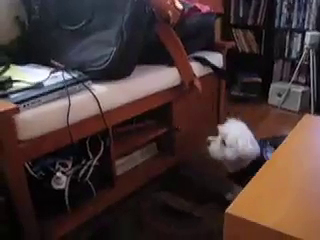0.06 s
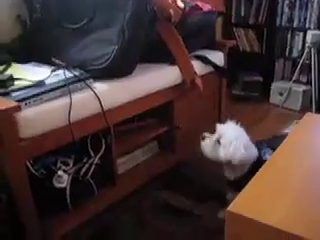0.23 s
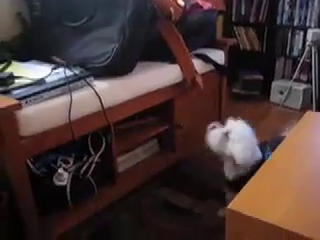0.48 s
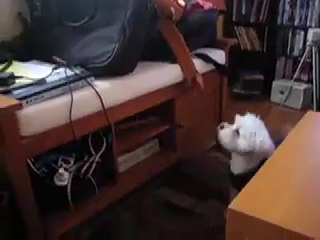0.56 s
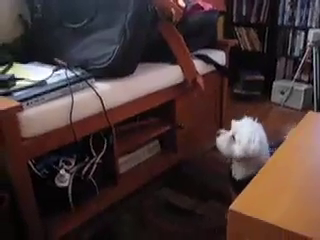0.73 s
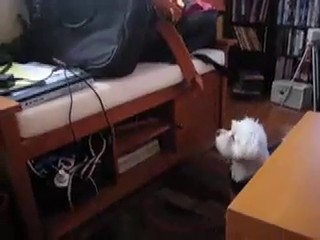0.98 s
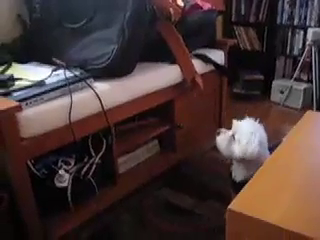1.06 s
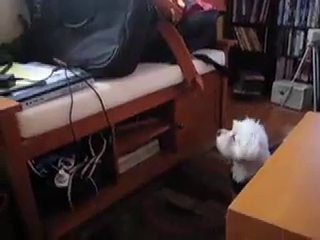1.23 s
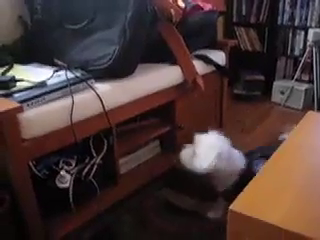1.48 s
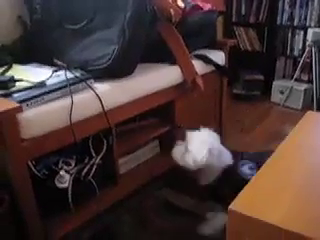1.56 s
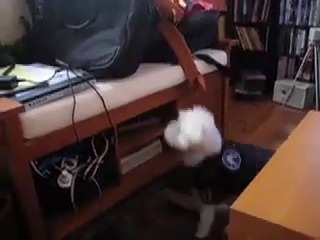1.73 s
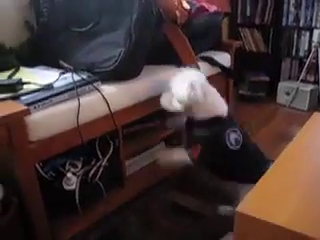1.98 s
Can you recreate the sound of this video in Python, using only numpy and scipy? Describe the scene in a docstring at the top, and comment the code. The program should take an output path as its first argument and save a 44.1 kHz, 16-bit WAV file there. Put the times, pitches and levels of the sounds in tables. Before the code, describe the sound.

A small dog sniffs and snorts, gives one gruff bark, then draws breath and lets out a short yip. Each call ends in a huff. Its paws thud softly on carpet in a quiet living room.

```python
"""A small dog gives one gruff bark and later a short yip, as its vocal folds chop its breath into pulses.
Each call ends in a huff of rushing air. Before the bark it sniffs and splutters a wet snort through its
nose; before the yip it draws breath, then hops and lands with soft thuds on the carpet.
The furnished living room adds a short echo, over a faint hiss and hum."""
import sys
import numpy as np
from scipy import signal
from scipy.fft import rfft, irfft
from scipy.io import wavfile

SR = 44100
rng = np.random.default_rng(int(sys.argv[2]) if len(sys.argv) > 2 else 0)


def inscribe(sig):
    """Save sig as 16-bit PCM at rate SR to the path in sys.argv[1].

    A 1-D sig is mono; a 2-D sig holds one channel per row.
    Samples are clipped to [-1, 1] before scaling.
    """
    pcm = np.round(np.clip(np.atleast_2d(sig).T, -1, 1) * 32767)
    wavfile.write(sys.argv[1], SR, pcm.astype(np.int16))


N = 88200
T = np.arange(N) / SR

# pitch and loudness of the bark (t/s, f/Hz, level/dB)
BARK_CURVE = [(0.465, 329.3, -50), (.472, 337.5, -41.5), (.489, 398.3, -31), (.499, 547.3, -15),
              (.509, 631.6, -11.5), (.527, 653.5, -12), (0.536, 581, -19.5), (0.546, 497, -20.5),
              (0.557, 455, -29)]
# mouth opening in the bark (t/s, factor on the throat's frequencies)
MOUTH_OPENING = [(.468, 1.2), (.495, 0.68), (.51, 1.04), (.526, 1.04), (.545, 0.87)]
# where the throat rings (f/Hz, width/Hz, level/dB, how much it follows the mouth 0-1)
THROAT_BANDS = [(620, 340, -0.5, 0.7), (1010, 380, -2, 0.7), (1316, 330, -1, 1), (2016, 220, 0.5, 0.13),
                (2360, 210, -11, 0), (2790, 220, -13.5, 0.2), (3540, 330, -14.5, 0)]
# chest growl under the bark (t/s, level/dB)
GROWL_CURVE = [(0.467, -45), (0.472, -31), (0.487, -26), (.515, -21.5), (0.529, -55), (0.534, -42)]
# nose whistle as the bark turns into a huff (t/s, f/Hz, level/dB)
WHISTLE_CURVE = [(0.489, 4900, -35), (0.507, 4760, -26.5), (0.524, 4770, -26), (0.541, 5500, -25),
                 (.562, 5730, -37), (.585, 5800, -57)]
# pitch and loudness of the yip (t/s, f/Hz, level/dB)
YIP_CURVE = [(1.644, 431.3, -45), (1.651, 448.8, -32.5), (1.667, 489.6, -19.5), (1.673, 509.6, -19),
             (1.696, 517.8, -22), (1.699, 508.6, -30.5), (1.722, 480.4, -32), (1.746, 405, -51)]
# strength of the yip's harmonics (f/Hz, level/dB)
YIP_COLOUR = [(480, -4), (900, -2.5), (1050, -22.5), (1500, -21.5), (2000, -20), (2500, -21), (3200, -22.5),
              (3900, -39), (14000, -38)]
# squeaks over the yip (peak t/s, rise/s, fall/s, f/Hz, glide/(Hz per s), level/dB)
SQUEAKS = [(1.665, .007, 0.018, 4850, 23992, -33.5), (1.699, .008, 0.01, 13950, -3000, -41),
           (1.72, .005, .007, 10400, -2000, -37)]
# breaths out (t/s, rise/s, hold/s, time to fade 20 dB/s, level/dB, sag/dB)
HUFFS = [(0.524, 0.016, 0.072, 0.071, -20, -2), (1.663, 0.043, 0.045, 0.09, -27, -2.5)]
# tone colour, one list per huff (f/Hz, level/dB)
HUFF_COLOURS = [
    [(80, -38), (250, -32), (400, -28), (600, -3), (790, -13), (950, -4.5), (1270, -4.5), (1500, -7.5),
     (1730, -13), (1900, -8.5), (2350, -6.5), (2650, -8.5), (4300, -9.5), (5400, -9.5), (6500, -18),
     (9200, -13.5), (11000, -23.5), (14000, -26), (15500, -50)],
    [(80, -28), (300, -8), (420, 7), (700, -1.5), (1200, -9), (1750, -7), (2800, -0.5), (3700, -3),
     (5300, -1), (6500, -5), (8000, -6.5), (9600, -5.5), (11500, -14), (14000, -16), (15500, -37)],
]
# breaths in (t/s, rise/s, hold/s, fade/s, level/dB, sag/dB)
INHALES = [(1.29, 0.056, 0.046, 0.16, -38.5, -0.5), (1.54, 0.025, 0.091, 0.026, -45, -2),
           (0.3974, 0.017, 0.013, 0.04, -36.5, -1.5), (1.79, 0.042, 0.025, 0.021, -40.5, -2)]
# tone colour of a breath in (f/Hz, level/dB)
BREATH_COLOUR = [(200, -16), (450, -7), (1000, -8), (1600, -6.5), (2300, -3), (3500, -1), (5500, -6.5),
                 (8000, -10.5), (12000, -17), (15500, -29)]
# wet pops of the snort (t/s, level/dB, decay/s, f/Hz, width/Hz, spray/dB)
SNORT_POPS = [(0.2067, -15.5, 0.0024, 2420, 1800, -18), (0.211, -12.5, 0.0082, 2610, 1010, -9.5),
              (0.2315, -19.5, 0.0029, 600, 455, 1), (0.2383, -25.5, 0.0015, 2860, 1500, 5),
              (0.24, -15, .0018, 860, 446, 4.5), (0.2544, -12, 0.005, 1430, 910, -3),
              (.262, -20, 0.011, 3020, 1970, -1.5), (0.2702, -24, 0.0093, 1440, 905, -2)]
# where the nose rings (f/Hz, width/Hz, level/dB)
NOSE_BANDS = [(570, 83, -5), (907, 120, -4), (1544, 140, -2), (2445, 430, -0.5), (3240, 230, 5)]
# tone colour of wet spray (f/Hz, level/dB)
SPRAY_COLOUR = [(180, 10.5), (330, -1.5), (550, 8.5), (3300, -4.5), (4500, -1), (8700, -3.5), (11500, -8.5),
                (12600, -8), (15500, -32)]
# nostril hisses and whistles (peak t/s, rise/s, f/Hz, glide/(Hz per s), width/Hz, level/dB)
SNIFF_BANDS = [(0.12, 0.063, 3160, -600, 640, -44), (0.223, 0.038, 6450, -6000, 600, -39),
               (0.234, 0.039, 4500, -12000, 1200, -33.5), (0.21, 0.055, 8700, -7000, 900, -39.5),
               (0.22, 0.19, 3400, -2, 7800, -39.5)]
# mouth and claw ticks (t/s, level/dB, decay/s, f/Hz, width/Hz, spray/dB)
TICKS = [(0.029, -32.5, 0.0011, 7000, 4000, 1), (0.4155, -29, 0.0079, 2350, 2460, -15),
         (.591, -22.5, 0.0013, 620, 300, -12), (0.804, -40.5, 0.0028, 6500, 5000, 2),
         (1.542, -25, 0.0011, 3080, 2220, -6)]
# paws on the carpet (t/s, level/dB, f/Hz)
PAW_STEPS = [(0.586, -41.5, 74), (1.433, -42, 394), (1.546, -37.5, 85.5), (1.573, -39, 177),
             (1.598, -35.5, 77), (1.793, -30, 106), (1.821, -25, 137), (1.832, -26.5, 116),
             (1.858, -32, 173), (1.897, -37, 134)]
# first echoes off the furniture (delay t/s, level/dB)
ECHOES = [(.0046, -14.5), (0.0151, -24.5), (0.0159, -10.5)]
# notes at which the room rings (f/Hz, level/dB)
ROOM_NOTES = [(472, 4), (612, -2.5), (668, -5), (752, 4.5), (925, 2), (1005, -1.5), (1076, -5), (1262, 5),
              (1339, -1.5), (1456, -4), (1906, -3.5), (2160, -8), (2302, 2)]
# how long the room's tail takes to fade 60 dB (f/Hz, t/s)
ROOM_FADE = [(200, 0.66), (500, 0.456), (4000, 0.3735), (9000, 0.24), (15000, 0.6)]
# tone colour of the background hiss (f/Hz, level/dB)
HISS_COLOUR = [(15, -6), (25, 0.5), (79, -2), (246, -7), (274, -12), (305, 5), (331, -9.5), (598, -9.5),
               (848, -7), (1140, -11.5), (2300, -13), (7100, -15.5), (9050, -22), (12000, -25.5),
               (15500, -25)]
# background hum and whine (f/Hz, width/Hz, level/dB)
HUM_BANDS = [(304, 10, -64.5), (7780, 420, -62.5), (10600, 1200, -60.5), (15140, 60, -71)]


def bark(jitter=0.07, unevenness=0.98, roughness=0.5, hiss_db=-16.5):
    """Rough vocal fold pulses, strong and weak in turn, ring the throat as the mouth opens and closes."""
    times, pitch, db = np.transpose(BARK_CURVE)
    cycles = np.cumsum(np.interp(T, times, pitch) * (1 + jitter * wobble(200))) / SR
    pulses = sum(np.cos(2 * np.pi * k * cycles) for k in range(1, 9))
    folds = unit(pulses * (1 + unevenness * np.cos(np.pi * cycles)))
    airflow = 0.39 + np.exp(-(cycles / 2 % 1) / 0.4)  # a puff on every second pulse
    puffs = unit(signal.lfilter([1], [1, -0.7], airflow * rng.standard_normal(N)))
    buzz = (1 - roughness) * folds + roughness * puffs
    mouth = np.interp(T, *np.transpose(MOUTH_OPENING))
    voice = sum((-1) ** k * amp(band_db) * resonate(buzz, hz * mouth ** share, width)
                for k, (hz, width, band_db, share) in enumerate(THROAT_BANDS))
    hiss = amp(hiss_db) * follow_level(puffs, times, db)
    return low_cut(follow_level(voice, times, db) + hiss + growl() + nose_whistle(puffs), hz=145)


def growl(pulse_hz=173.6, jitter=0.2):
    """Slower, uneven pulses ring the chest under the bark."""
    cycles = np.cumsum(pulse_hz * (1 + jitter * wobble(152))) / SR
    pulses = np.diff(np.floor(cycles), prepend=0) - pulse_hz / SR
    return follow_level(resonate(pulses, hz=266, width=150), *np.transpose(GROWL_CURVE))


def nose_whistle(puffs):
    """The bark's puffs of air ring the nose at a climbing pitch."""
    times, hz, db = np.transpose(WHISTLE_CURVE)
    return follow_level(resonate(puffs, np.interp(T, times, hz), width=420), times, db)


def yip(jitter=0.008, breathiness=0.015, brighten=0.73, dull_db_per_s=220):
    """A nearly clean note rises and falls; it brightens with effort, then dulls."""
    times, pitch, db = np.transpose(YIP_CURVE)
    hz = np.interp(T, times, pitch) * (1 + jitter * wobble(235))
    phase = 2 * np.pi * np.cumsum(hz) / SR
    effort_db = np.interp(T, times, db) - db.max()
    bright = amp(brighten * effort_db - dull_db_per_s * np.maximum(T - times[2], 0))
    voice = sum(amp(look_up(YIP_COLOUR, k * hz)) * (bright if k > 2 else 1) * np.sin(k * phase)
                for k in range(1, 28))
    return follow_level(voice, times, db) + breathiness * level(times, db) * noise(BREATH_COLOUR)


def squeak(peak, rise, fall, hz, glide, db):
    """A thin, unsteady whistle slides in pitch."""
    t = T - peak
    pitch = (hz + glide * np.clip(t, -rise, 1.6 * fall)) * (1 + 0.0084 * wobble(350))
    return amp(db) * swell(t, rise, fall) * unit(np.sin(2 * np.pi * np.cumsum(pitch) / SR))


def breath(colour, start, rise, hold, fade, db, sag_db, flutter=0.13):
    """A fluttering rush of air grows, sags a little, then drops 20 dB in each fade time."""
    t = T - start
    drop_db = sag_db * np.clip((t - rise) / hold, 0, 1) - 20 * np.maximum(t - rise - hold, 0) / fade
    air = unit(noise(colour) * (1 + flutter * wobble(170)))
    return amp(db + drop_db) * np.clip(t / rise, 0, 1) * air


def snort(leak_db=-6):
    """A run of wet pops rings the nose; some of the sound leaks straight out."""
    air = sum(pop(*row) for row in SNORT_POPS)
    ringing = sum(amp(db) * signal.lfilter(*signal.iirpeak(hz, hz / width, SR), air)
                  for hz, width, db in NOSE_BANDS)
    return amp(leak_db) * air + ringing


def pop(start, db, decay, hz, width, spray_db):
    """A sudden burst rings at one pitch, with a hiss of spray."""
    shape = (T >= start) * np.exp(-np.maximum(T - start, 0) / decay)
    ring = unit(resonate(shape * rng.standard_normal(N), hz, width)) * np.sqrt(np.mean(shape ** 2))
    return amp(db) * (ring + amp(spray_db) * shape * noise(SPRAY_COLOUR))


def sniff(fall_s=0.055):
    """Air hisses through the nostrils; each whistle swells, drops in pitch and fades."""
    out = np.zeros(N)
    for peak, rise, hz, glide, width, db in SNIFF_BANDS:
        t = T - peak
        pitch = hz + glide * np.clip(t, -2 * rise, 2 * rise)
        out += amp(db) * swell(t, rise, fall_s) * noise_band(pitch, width)
    return out


def paw(start, db, hz, rise_s=0.0025, decay_s=0.015, scuff_db=-7.5):
    """A soft step: the floor thuds and the carpet scuffs."""
    t = np.maximum(T - start, 0)
    thud = 2 * np.sin(2 * np.pi * hz * t)
    scuff = amp(scuff_db) * noise_band(hz=194, width=270)
    return amp(db) * (1 - np.exp(-t / rise_s)) * np.exp(-t / decay_s) * (thud + scuff)


def room(x, tail_db=-10.5, build_s=0.021, ring_s=0.23):
    """Sound bounces off the furniture, rings the room and blurs into a short tail."""
    echoes = sum(amp(db) * np.interp(T - delay, T, x, left=0) for delay, db in ECHOES)
    hz, times, bands = signal.stft(rng.standard_normal(SR // 2), SR, nperseg=256)
    tail = signal.istft(bands * amp(-60 * times / look_up(ROOM_FADE, hz)[:, None]), SR, nperseg=256)[1]
    t = T[:len(tail)]
    tail *= np.minimum(t / build_s, 1) ** 2
    rate = np.log(1000) / ring_s  # fades 60 dB in ring_s
    notes = sum(amp(db) * np.cos(2 * np.pi * f * t) for f, db in ROOM_NOTES)
    ringing = 2 * rate / SR * np.exp(-rate * t) * notes
    return x + echoes + signal.fftconvolve(x, ringing + amp(tail_db) * tail / np.linalg.norm(tail))[:N]


def background(hiss_db=-44):
    """Steady hiss with a wavering hum and a soft whine."""
    hiss = amp(hiss_db) * noise(HISS_COLOUR)
    return hiss + sum(amp(db) * noise_band(hz, width) for hz, width, db in HUM_BANDS)


def amp(db):
    """Turns decibels into a gain."""
    return 10 ** (np.asarray(db) / 20)


def unit(x):
    """Scales a sound to an average strength (rms) of 1."""
    return x / np.sqrt(np.mean(x ** 2) + 1e-20)


def look_up(points, hz):
    """Reads a table between its frequencies, on a log scale."""
    f, value = np.transpose(points)
    return np.interp(np.log(hz + 1), np.log(f), value)


def level(times, db):
    """Gain along a level curve, silent outside it."""
    return amp(np.interp(T, times, db)) * (T >= times[0]) * (T <= times[-1])


def follow_level(x, times, db):
    """Gives a steady sound the loudness of a level curve."""
    gain = level(times, db)
    return gain * x / np.sqrt(np.average(x ** 2, weights=gain ** 2))


def swell(t, rise, fall):
    """A smooth hump that peaks at t = 0."""
    return np.exp(-(t / np.where(t < 0, rise, fall)) ** 2 / 2)


def noise(colour):
    """Noise with the given tone colour."""
    gain = amp(look_up(colour, np.fft.rfftfreq(N, 1 / SR)))
    return unit(irfft(rfft(rng.standard_normal(N)) * gain, N))


def noise_band(hz, width):
    """Noise around one pitch."""
    return unit(resonate(rng.standard_normal(N), hz, width))


def wobble(hz):
    """Random motion, mostly slower than hz."""
    return unit(irfft(rfft(rng.standard_normal(N)) / (1 + (np.fft.rfftfreq(N, 1 / SR) / hz) ** 2), N))


def resonate(x, hz, width):
    """Lets a sound ring in a band around hz, which may move."""
    spin = np.exp(2j * np.pi * np.cumsum(hz * np.ones(N)) / SR)
    r = np.exp(-np.pi * abs(width) / SR)
    return 2 * (spin * signal.lfilter([(1 - r) ** 2], [1, -2 * r, r * r], x / spin + 1e-18)).real


def low_cut(x, hz):
    """Removes deep bass, which a small body cannot give off."""
    return signal.sosfilt(signal.butter(4, hz, "high", fs=SR, output="sos"), x)


def scene():
    """The dog in the room, over the background."""
    splutter = low_cut(snort() + sum(pop(*row) for row in TICKS), hz=172)
    calls = bark() + yip() + sum(squeak(*row) for row in SQUEAKS)
    huffs = sum(breath(colour, *row) for colour, row in zip(HUFF_COLOURS, HUFFS))
    inhales = sum(breath(BREATH_COLOUR, *row) for row in INHALES) + sniff()
    steps = sum(paw(*row) for row in PAW_STEPS)
    dog = calls + huffs + inhales + splutter + steps
    return (room(dog) + background())[None]


def record(dry, ceiling=0.88, top_hz=15400):
    """Clips any peak above the ceiling and cuts the highest treble."""
    treble_cut = signal.firwin(511, top_hz, window=("kaiser", 9), fs=SR)
    return signal.oaconvolve(np.clip(dry, -ceiling, ceiling), treble_cut[None], "same")


dry = scene()
out = record(dry)
inscribe(out)
```